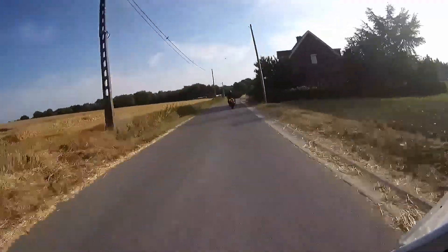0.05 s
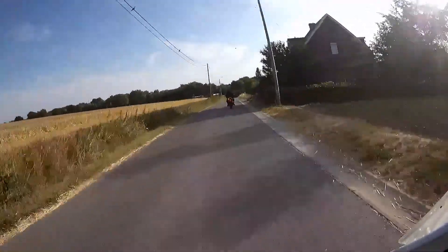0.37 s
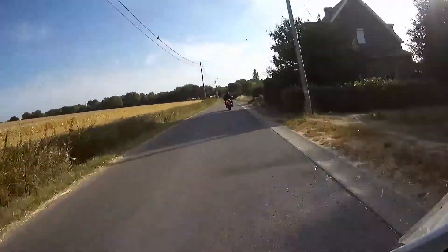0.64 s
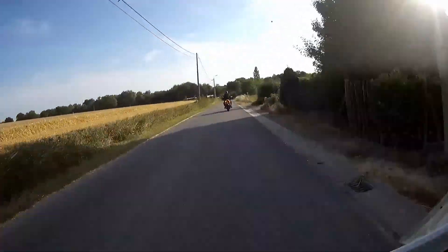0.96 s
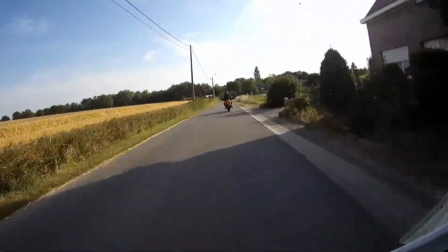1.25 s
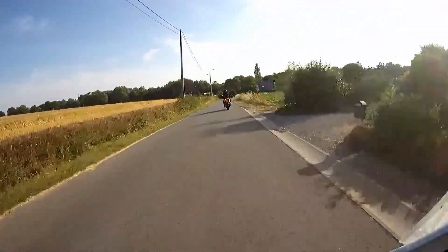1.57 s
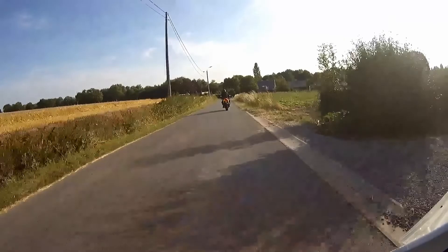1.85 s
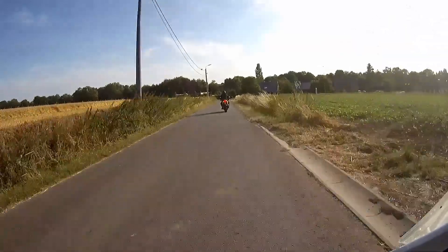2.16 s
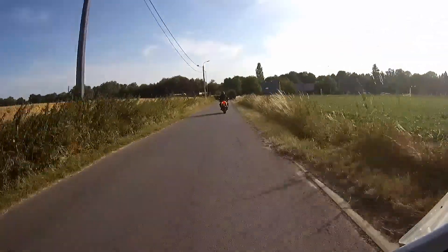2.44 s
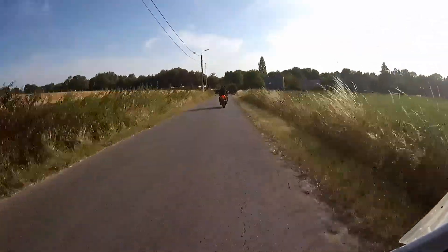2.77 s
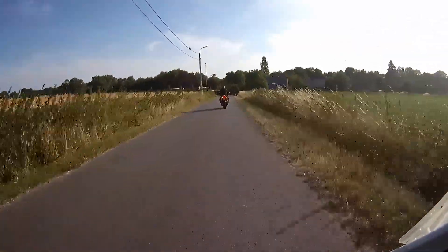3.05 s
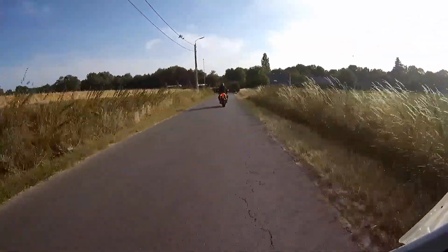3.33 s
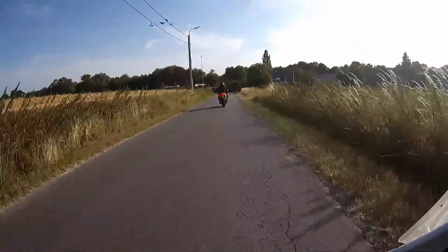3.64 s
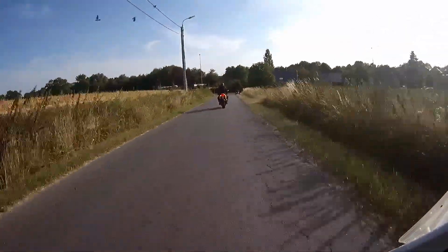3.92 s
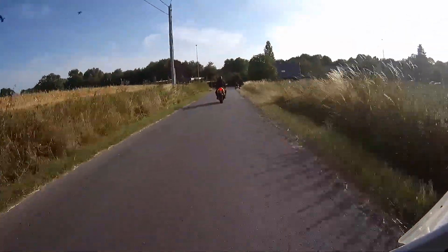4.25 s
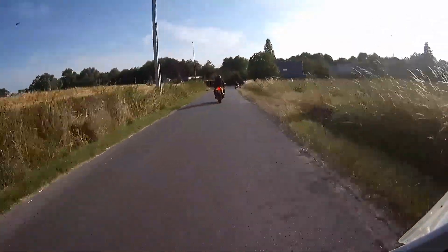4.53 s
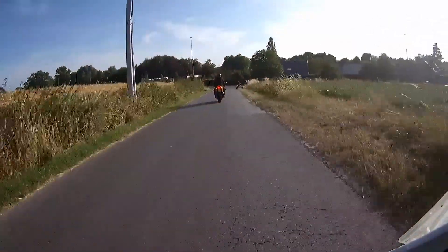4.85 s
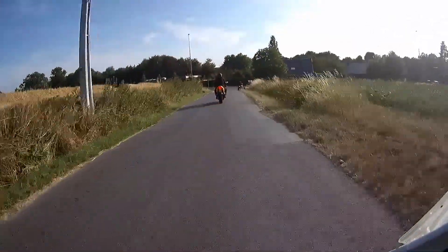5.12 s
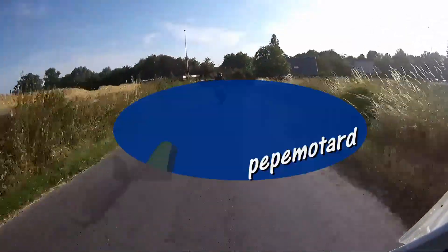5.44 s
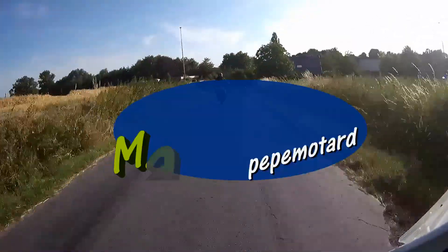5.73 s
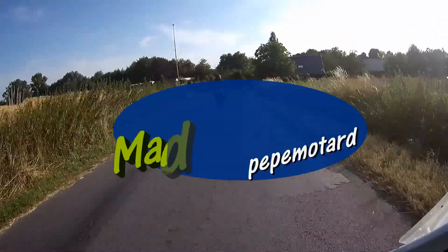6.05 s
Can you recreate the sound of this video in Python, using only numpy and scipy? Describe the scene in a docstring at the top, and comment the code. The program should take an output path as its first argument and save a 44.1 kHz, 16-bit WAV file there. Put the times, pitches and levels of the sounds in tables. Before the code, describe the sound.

Wind rushes and thumps against a microphone on board a motorcycle outdoors, slightly overloading it at first. Under it the engine hums on a closing throttle, sliding gradually lower, with a buzzing plastic panel, sharp irregular clacks and dull knocks from the road. As the bike slows, the wind and rattling fade and the engine settles into a low, uneven idling beat.

```python
"""Gusty wind and a falling drone: a twin-cylinder motorcycle rolls down a lane, heard behind its fairing.
Eddies buffet a camera case, overload the microphone at first and die down with the road speed.
Road bumps knock the mount; a loose panel rattles with the engine and clacks on rough patches.
On a closing throttle the engine's harmonics slide down through airbox and fairing resonances,
until the clutch is pulled and uneven firings ring the exhaust pipe in a lumpy idle."""
import sys
import numpy as np
from scipy import signal
from scipy.fft import rfft, irfft, next_fast_len
from scipy.io import wavfile

SR = 44100
rng = np.random.default_rng(int(sys.argv[2]) if len(sys.argv) > 2 else 0)


def unload_wav(signal):
    """Save mono or channel-first audio to the path in sys.argv[1] as 16-bit WAV at rate SR, clipped to [-1, 1]."""
    wavfile.write(
        sys.argv[1],
        SR,
        np.round(np.clip(np.atleast_2d(signal).T, -1, 1) * 32767).astype(np.int16),
    )


N = 272979
T = np.arange(N) / SR

# airflow, dying down with the road speed: (time [s], relative level [dB])
AIRFLOW = [(0, -17), (1.2, -15.5), (2.35, -13.5), (3.05, -16), (3.5, -19), (4.4, -22.5), (5, -26.5),
           (6.19, -31)]
CRUISE_DB = -14  # airflow level at cruising speed
# bending modes of the loose panel: (frequency [Hz], bandwidth [Hz], relative level [dB])
PANEL_MODES = [(1612, 260, 2), (2640, 150, -12)]


def undb(db):
    """Decibels to amplitude ratio."""
    return 10 ** (np.asarray(db) / 20)


def unit(x):
    """Normalise to rms 1."""
    return x / np.sqrt(np.mean(x ** 2))


def curve(rows):
    """Linear interpolation of (time [s], value) rows."""
    return np.interp(T, *np.transpose(rows))


def colour(x, points):
    """Zero-phase filtering by a (frequency [Hz], gain [dB]) outline."""
    size = next_fast_len(N + 4096)
    hz, db = np.transpose(points)
    f = np.maximum(np.arange(size // 2 + 1) * SR / size, 1)
    gain = undb(np.interp(np.log(f), np.log(hz), db))
    return irfft(rfft(x, size) * gain, size)[:N]


def noise(points):
    """Gaussian noise of rms 1 with a (frequency [Hz], relative level [dB]) spectrum."""
    return unit(colour(rng.standard_normal(N), points))


def low_pass(x, hz, order=4):
    """Maximally flat low-pass filter."""
    return signal.sosfilt(signal.butter(order, hz, fs=SR, output="sos"), x)


def wander(hz):
    """Random modulation of rms 1, band-limited to about hz."""
    lead = SR // 2
    return unit(low_pass(rng.standard_normal(N + lead), hz, order=2)[lead:])


def resonate(x, hz, width_hz, passes=1):
    """Second-order resonance of gain 1 at its centre; each further pass steepens the skirts."""
    for _ in range(passes):
        x = signal.lfilter(*signal.iirpeak(hz, hz / width_hz, fs=SR), x)
    return x


def bumps(contact_s=0.0012, rubber_hz=2600):
    """Impact excitation: road jolts ring the case and mount, and rubber pads absorb the treble."""
    # road jolts: (time [s], relative level [dB])
    jolts = [(.456, -1.5), (1.598, -2), (2.683, -7), (3.568, -9.5), (3.78, -8.5), (4.176, -6), (4.536, -10),
             (4.569, -15), (4.784, -13), (4.816, -14.5), (5.133, -9.5), (5.701, -15)]
    # modes of the plastic case and mount: (frequency [Hz], 60 dB decay time [s], relative level [dB])
    case_modes = [(235, 0.096, 5.5), (597, 0.0078, 16), (970, 0.028, 1), (1718, 0.013, -6),
                  (2770, 0.0082, -15.5)]
    t = T[:SR // 10]
    ring = sum(undb(db - 60 * t / t60) * np.sin(2 * np.pi * hz * t) for hz, t60, db in case_modes)
    out = np.zeros(N + len(t))
    for s, db in jolts:
        contact = rng.standard_normal(len(t)) * np.exp(-t / contact_s)
        knock = signal.fftconvolve(contact, ring)[:len(t)]
        at = int(s * SR)
        out[at:at + len(t)] += undb(db) * knock / np.abs(knock).max()
    return low_pass(out[:N], rubber_hz)


def rattle(cycles, level_db=-30.5, growth=1.4, scatter_db=5.0, jitter_turns=.06):
    """Forced vibration: once a crankshaft turn the panel taps its stop, now hard, now barely."""
    turns = np.arange(int(2 * cycles[-1]) + 1)  # two turns to a four-stroke cycle
    late, strength = rng.standard_normal((len(turns), 2)).T
    at = np.searchsorted(2 * cycles, turns + jitter_turns * late)
    heard = (at > 0) & (at < N)
    taps = np.zeros(N)
    taps[at[heard]] = undb(scatter_db * np.minimum(strength[heard], 1))
    ring = sum(undb(db) * resonate(taps, hz, 2 * width, passes=2) for hz, width, db in PANEL_MODES)
    return unit(ring) * undb(level_db + growth * (curve(AIRFLOW) - CRUISE_DB))


def clacks(gain_db=-1.5, contact_s=0.00037, t60_s=0.01, pitch_spread=0.03):
    """Damped free vibration: rough road throws the panel against its stop, and its modes ring out."""
    # hard strikes of the panel: (time [s], relative level [dB])
    strikes = [(0.2715, -15), (0.284, -9.5), (0.2977, -9), (0.4677, -4), (0.583, -15), (0.657, -7),
               (0.6702, -15), (0.7274, -12), (0.74, -9), (0.7606, -10), (0.771, -15), (0.8882, -17),
               (0.966, -12), (1.1283, -12), (1.184, -9), (1.231, -14), (1.382, -8.5), (1.505, -9),
               (1.849, -6), (1.935, -7.5), (2.001, -6), (2.2697, -11), (2.3523, -8), (2.71, -6.5),
               (5.7149, -22), (5.777, -23)]
    t = T[:SR // 10]
    envelope = (1 - np.exp(-t / contact_s)) * undb(-60 * t / t60_s)
    out = np.zeros(N + len(t))
    for s, db in strikes:
        # each strike lands elsewhere and rings a little higher or lower
        tunings = 1 + pitch_spread * rng.standard_normal(len(PANEL_MODES))
        ring = envelope * sum(undb(mode_db) * np.sin(2 * np.pi * hz * tuning * t)
                              for (hz, _, mode_db), tuning in zip(PANEL_MODES, tunings))
        at = int(s * SR)
        out[at:at + len(t)] += undb(db + gain_db) * ring / np.abs(ring).max()
    return out[:N]


def roar():
    """Flow-excited resonance: air rings two fairing gaps, the low first, the high as the wind swells."""
    # resonances of the gaps: (frequency [Hz], bandwidth [Hz])
    gaps = [(570, 276), (1020, 340)]
    # their strength: (time [s], low gap level [dB], high gap level [dB])
    gap_levels = [(0, -19, -36), (.9, -22.5, -42), (1.7, -29, -34), (2.4, -26, -26.5), (3.3, -33, -32),
                  (4.2, -40.5, -42), (5, -47, -51), (6.19, -50, -41)]
    times, *levels = np.transpose(gap_levels)
    out = 0
    for (hz, width), db in zip(gaps, levels):
        ring = resonate(rng.standard_normal(N), hz, width, passes=2)
        out += unit(ring) * undb(np.interp(T, times, db))
    return out


def wind(rush_db=1.0, hiss_db=-1, spit_db=-29, spit_growth=2.4, buffet_share=0.21):
    """Turbulent pressure fluctuation: eddies thump the case and modulate the rush, roar and hiss."""
    # spectra of the flow noise: (frequency [Hz], relative spectral level [dB])
    buffet_spectrum = [(8, -11), (20, 5), (35, 5.5), (60, 2.5), (100, 2.5), (170, -3.5), (260, -8),
                       (450, -15), (1000, -97)]  # eddies striking the case
    rush_spectrum = [(80, -13.5), (200, 1), (330, 1), (560, -1.5), (700, -4), (850, -4.5), (1120, -6.5),
                     (1370, -12), (1600, -10), (1850, -18), (2100, -24.5), (3000, -31), (5000, -80)]  # air passing over it
    hiss_spectrum = [(1200, -31.5), (2200, -0.5), (2850, 2), (3700, -4.5), (4200, -10.5), (4800, -19),
                     (6000, -26.5), (8000, -63)]  # fine turbulence at the sound port
    spit_spectrum = [(2500, -4.5), (4200, 0), (5200, -3), (6400, -8), (7600, -10), (8200, -30),
                     (10000, -43)]  # sharp spits in fast air
    # envelopes of the wind's bass and treble: (time [s], relative level [dB])
    buffet_levels = [(0, -13.5), (1.05, -16), (1.85, -12.5), (2.5, -13), (3.5, -20), (3.9, -16), (4.2, -19),
                     (4.85, -17.5), (5.3, -21), (6.19, -26)]
    treble_levels = [(0, -31), (2.95, -32.5), (4.4, -43.5), (5, -47.5), (6.19, -50)]
    # single gusts and lulls: (time [s], duration [s], gain [dB])
    gusts = [(2.28, 0.085, 2), (2.715, 0.07, 1.5), (3.3, 0.068, 2.5), (3.88, 0.15, 3), (4.38, 0.23, 3),
             (4.55, .1, 2.5), (4.82, 0.14, 2.5), (4.94, 0.11, -1), (5.02, 0.064, 3), (5.32, 0.12, 3.3),
             (5.71, 0.07, 4)]
    gusts_db = sum(db * np.cos(np.pi * np.clip((T - s) / length, -.5, .5)) ** 2
                   for s, length, db in gusts)
    treble_db = curve(treble_levels) + gusts_db
    eddies_db = wander(93) + 0.8 * wander(15)
    buffet = noise(buffet_spectrum) * undb(curve(buffet_levels) + buffet_share * gusts_db)
    rush = unit(noise(rush_spectrum) * undb(eddies_db)) * undb(curve(AIRFLOW) + gusts_db + rush_db)
    hiss = unit(noise(hiss_spectrum) * undb(eddies_db + 1.8 * wander(230))) * undb(treble_db + hiss_db)
    # the finest turbulence crackles in bursts and grows much faster with speed than the hiss does
    crackle = unit(noise(spit_spectrum) * undb(4 * wander(410) + 2 * wander(12)))
    speed_db = spit_growth * (treble_db - curve(treble_levels).max())
    spit = crackle * undb(CRUISE_DB + spit_db + speed_db)
    gusty_roar = roar() * unit(undb(eddies_db)) * undb(gusts_db)
    return buffet + rush + gusty_roar + hiss + spit


def engine_motion(clutch_s=3.78, release_s=0.2, idle_hz=11.65, run_down_s=.39):
    """Cycle rate [Hz] and clutch release [0-1]: once uncoupled, the engine relaxes exponentially to idle."""
    # the engine slowing with the wheels: (time [s], four-stroke cycle rate [Hz])
    geared_rate = [(0, 35.55), (.8, 34.2), (1.3, 33.27), (2, 32.06), (2.25, 31.74), (2.5, 31.05), (3, 29.9),
                   (3.8, 27.25)]
    run_down = np.exp(-np.maximum(T - clutch_s, 0) / run_down_s)
    rate_hz = idle_hz + (curve(geared_rate) - idle_hz) * run_down
    return rate_hz, np.clip((T - clutch_s) / release_s, 0, 1)


def engine_load(rate_hz, freed, top_db=8, sag_db_per_hz=0.77, build_db=11.5, build_s=0.55):
    """Amplitude envelope of the tones in gear: it builds up, sags with the revs and ends with the clutch."""
    sag_db = sag_db_per_hz * (rate_hz.max() - rate_hz)
    onset_db = build_db * np.maximum(1 - T / build_s, 0)
    return undb(top_db - sag_db - onset_db) * (1 - freed)


def resonance_db(hz, resonances):
    """Gain of a tone passing through (frequency [Hz], bandwidth [Hz], gain [dB]) resonances."""
    return sum(peak_db / (1 + (2 * (hz - f) / width) ** 2) for f, width, peak_db in resonances)


def harmonic(multiple, cycles):
    """A sine of rms 1, phase-locked to a multiple of the engine cycle."""
    return np.sqrt(2) * np.sin(2 * np.pi * (multiple * cycles + rng.random()))


def whine(hz, cycles, multiple=16, level_db=-40):
    """Swept resonance: one clean high harmonic sings out as it falls through two close fairing modes."""
    fairing_db = resonance_db(multiple * hz, [(516, 32, 10.9), (498.5, 18, 9.3)])
    return harmonic(multiple, cycles) * undb(level_db + fairing_db)


def exhaust(rate_hz, cycles, freed, gear_db=-33, free_db=-21, scatter_db=0.3, jitter=0.01, muffler_hz=230):
    """Pipe resonance: two unevenly spaced firings a cycle, no two alike, excite the air column."""
    # firings of the two cylinders: (phase [cycles], relative level [dB])
    firings = [(.39, -4), (.83, -5)]
    # standing waves in the pipe: (frequency [Hz], bandwidth [Hz], relative level [dB])
    pipe_modes = [(58.4, 11, 2.5), (111, 30, 2.5), (202, 54, -16.5), (326, 54, -6.5)]
    pulses, starts = np.zeros(N), np.arange(int(cycles[-1]) + 1)
    for phase, db in firings:
        late, strength = rng.standard_normal((len(starts), 2)).T
        at = np.searchsorted(cycles, starts + phase + jitter * late)
        heard = (at > 0) & (at < N)
        pulses[at[heard]] += undb(db + scatter_db * strength[heard])
    # neighbouring modes leave the open end with opposite signs
    pipe = sum((-1) ** k * undb(db) * resonate(pulses, hz, width)
               for k, (hz, width, db) in enumerate(pipe_modes))
    muffled = low_pass(pipe, muffler_hz, order=2)
    beat = unit(muffled / np.sqrt(rate_hz))  # faster firings are each weaker, keeping the power even
    return beat * undb(gear_db + (free_db - gear_db) * freed)


def drone(hz, cycles, waver_db=2.0, rough_db=2.5, sway_cycles=0.016):
    """Harmonic series: each engine tone wavers in the wind and swells where it crosses a resonance."""
    # engine harmonics in gear: (multiple of the cycle rate, relative level [dB])
    partials = [(2, -37.5), (3, -29), (4, -25.5), (5, -31.5), (6, -34.5), (8, -34.5), (12, -38.5),
                (17, -44.5), (18, -43)]
    # airbox and fairing resonances: (frequency [Hz], bandwidth [Hz], gain [dB])
    airbox = [(59, 16, 12.5), (123.7, 35, 3.5), (265.5, 9.8, 8), (592, 6.8, 12)]
    flutter_db = rough_db * wander(45)  # from cycle to cycle, shared by all harmonics
    swayed = cycles + sway_cycles * wander(16)
    out = 0
    for multiple, db in partials:
        tone = harmonic(multiple, swayed)
        out += tone * undb(db + resonance_db(multiple * hz, airbox) + waver_db * wander(13.8) + flutter_db)
    return out


def dip(x, at_s=1.937, depth_db=-15, fall_s=.0003, recover_s=.013):
    """Transient attenuation: the whole sound ducks for a moment and recovers exponentially."""
    since = np.maximum(T - at_s, 0)
    fall = 1 - np.exp(-(since / fall_s) ** 2)
    return x * undb(depth_db * fall * np.exp(-since / recover_s))


def scene(case_hz=3600):
    """Superposition at one microphone: wind, bumps and the machine, whose treble the case dulls."""
    rate_hz, freed = engine_motion()
    hz = rate_hz * (1 + .0006 * wander(4.5))
    cycles = np.cumsum(hz) / SR
    tones = (drone(hz, cycles) + whine(hz, cycles)) * engine_load(rate_hz, freed)
    machine = tones + exhaust(rate_hz, cycles, freed) + rattle(cycles) + clacks()
    mono = dip(low_pass(machine, case_hz) + wind() + bumps())
    return np.array([mono, mono])


def record(dry, ceiling=0.71, knee=5, top_hz=10500):
    """Saturation: the microphone flattens the biggest gusts; the upper mids lean right; the top is cut."""
    # rightward lean: (frequency [Hz], side level relative to mid [dB])
    lean = [(150, -70), (300, -79), (500, -54.5), (800, -22.5), (1500, -21.5), (4000, -21.5), (7500, -25.5)]
    saturated = dry / (1 + np.abs(dry / ceiling) ** knee) ** (1 / knee)
    side = colour(saturated[0], lean)
    top_cut = signal.ellip(8, .2, 70, top_hz, fs=SR, output="sos")
    return signal.sosfilt(top_cut, saturated + np.array([-side, side]))


dry = scene()
out = record(dry)
unload_wav(out)
```